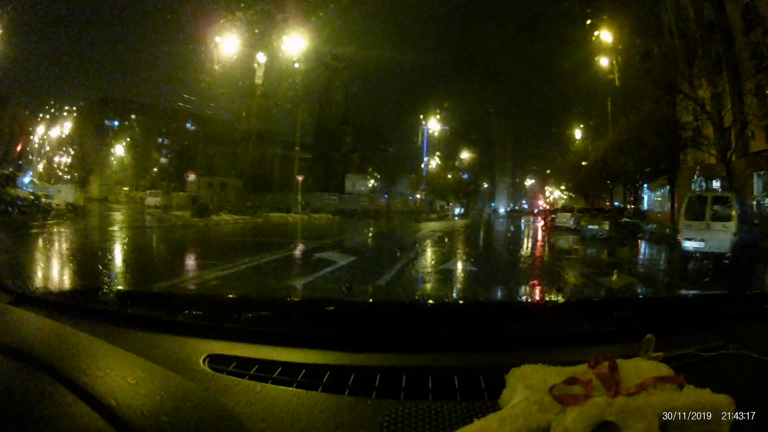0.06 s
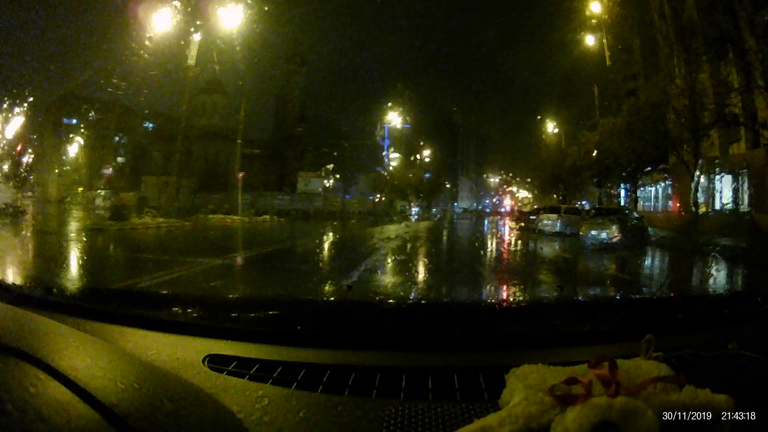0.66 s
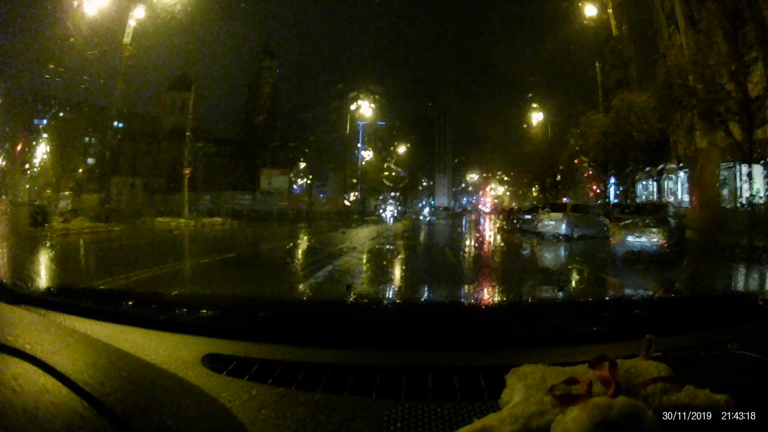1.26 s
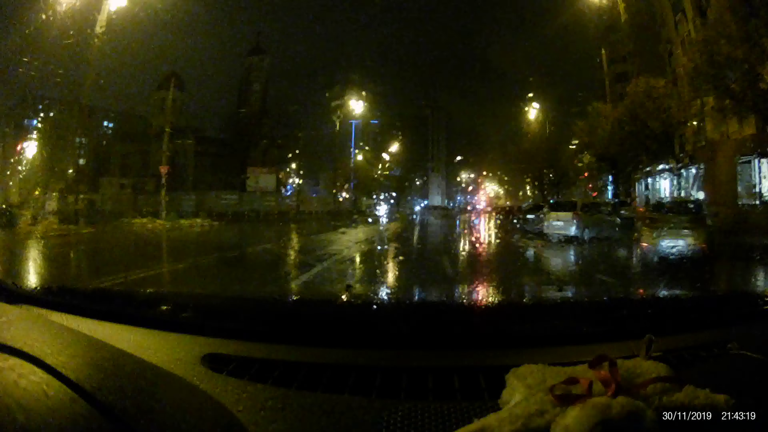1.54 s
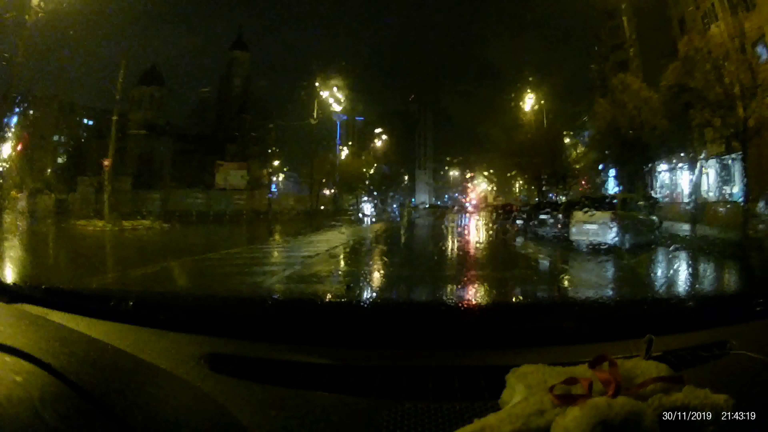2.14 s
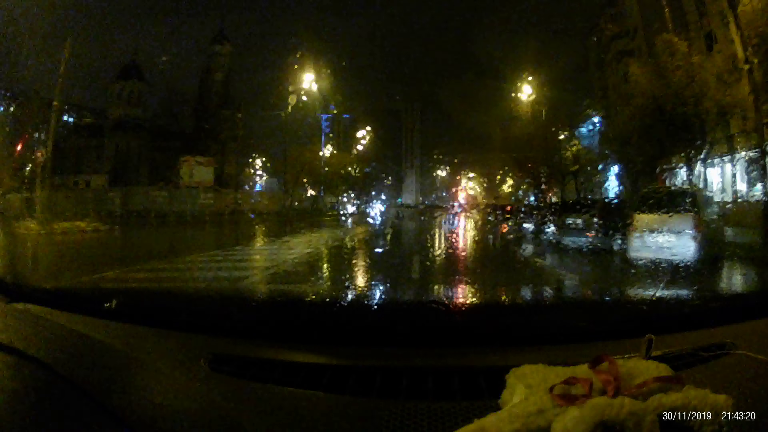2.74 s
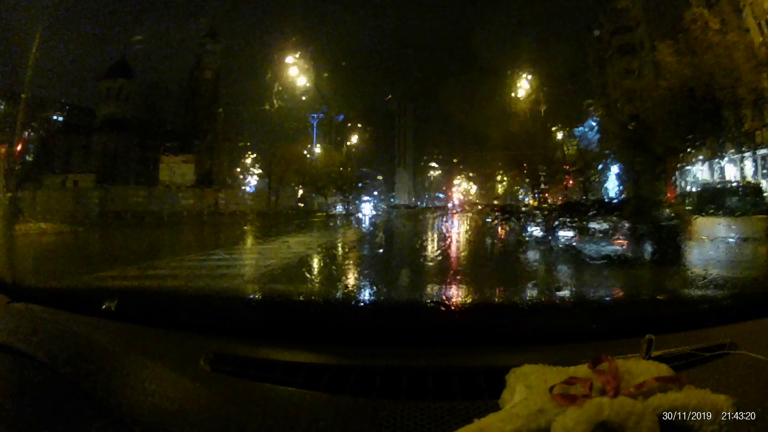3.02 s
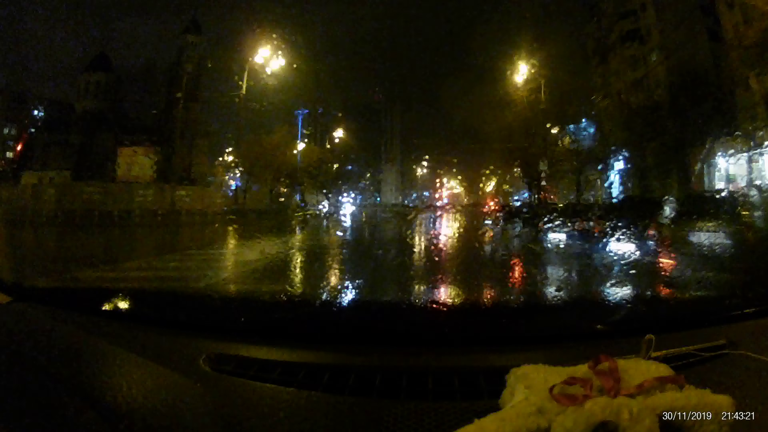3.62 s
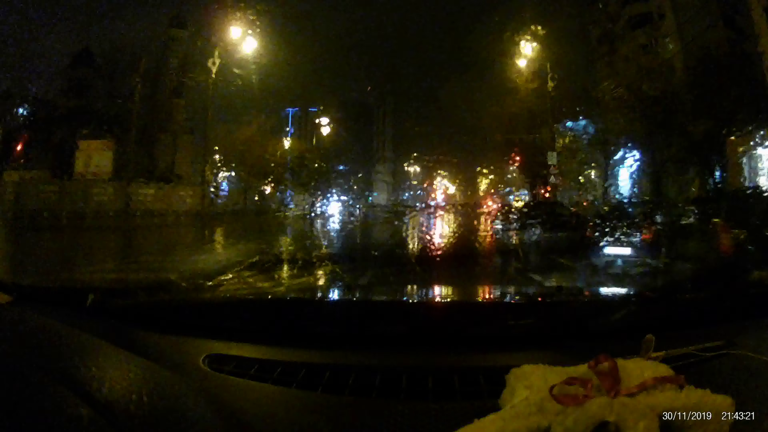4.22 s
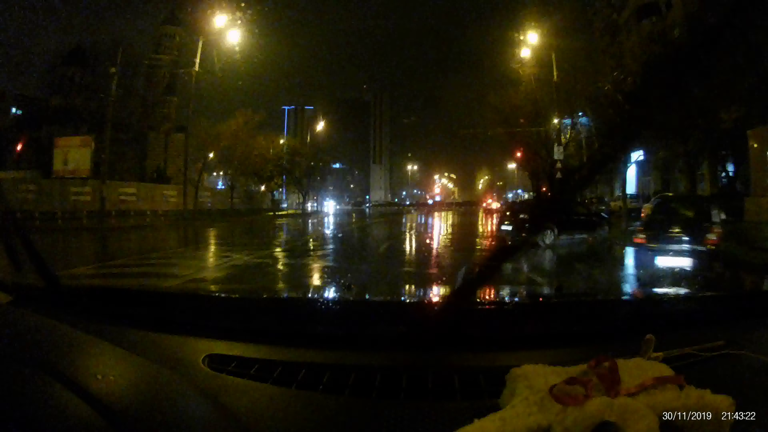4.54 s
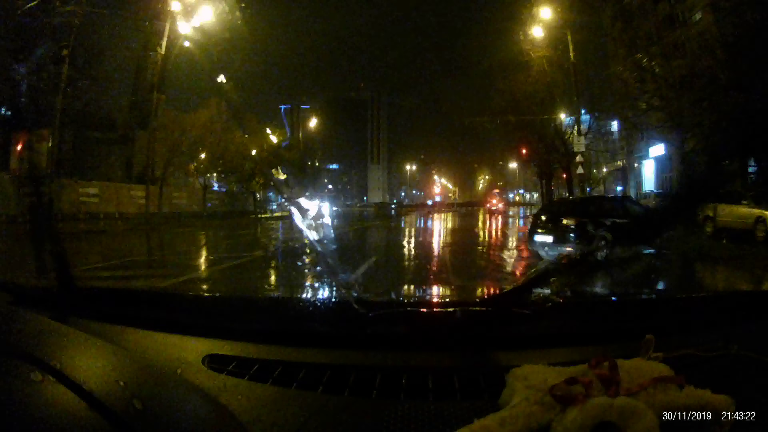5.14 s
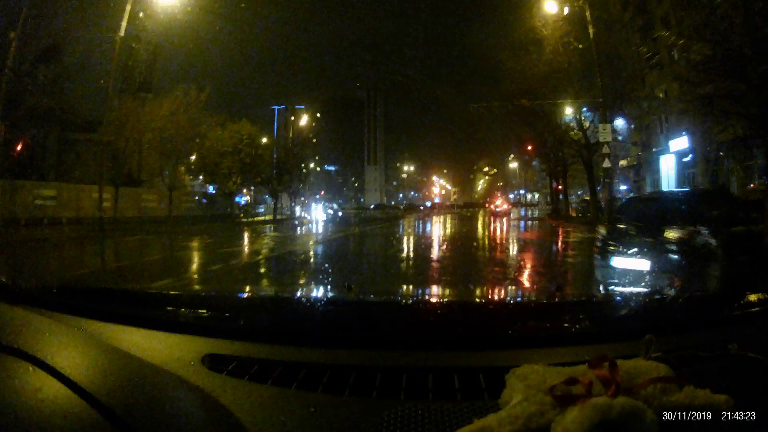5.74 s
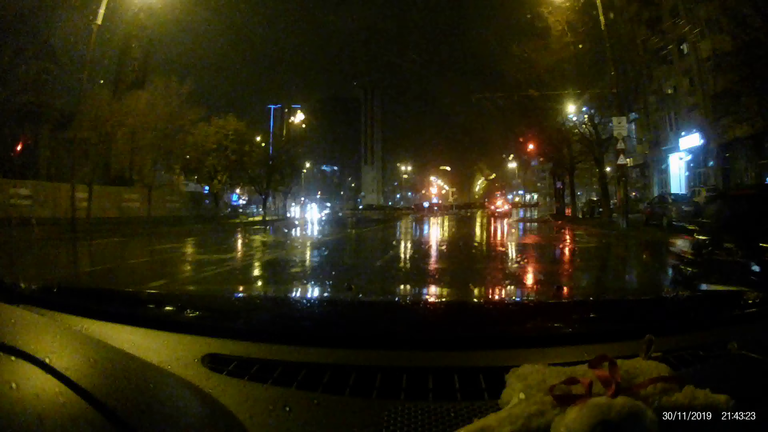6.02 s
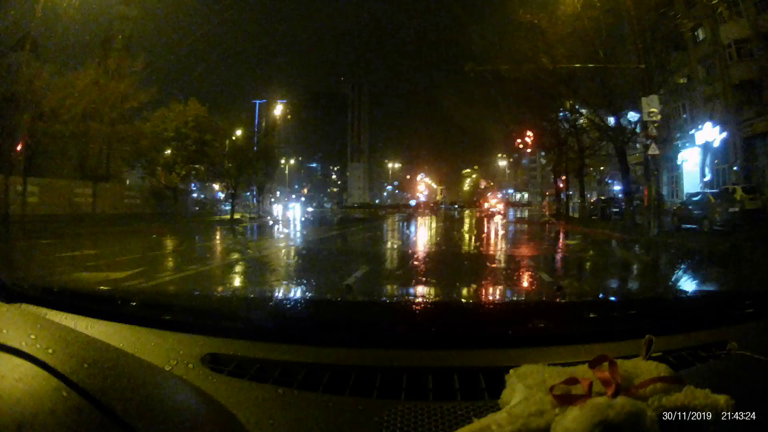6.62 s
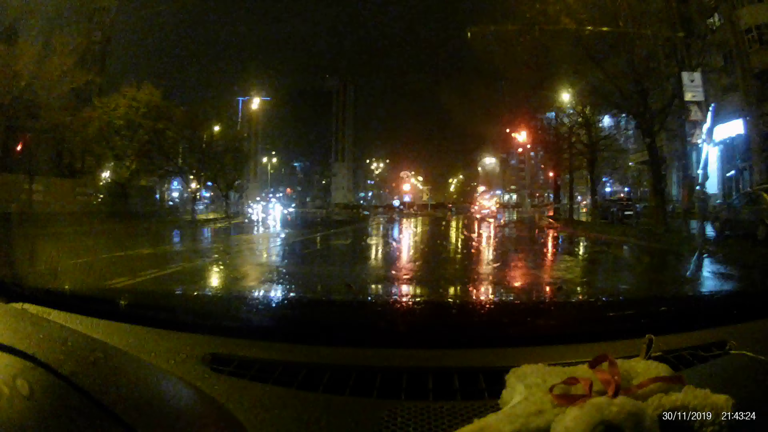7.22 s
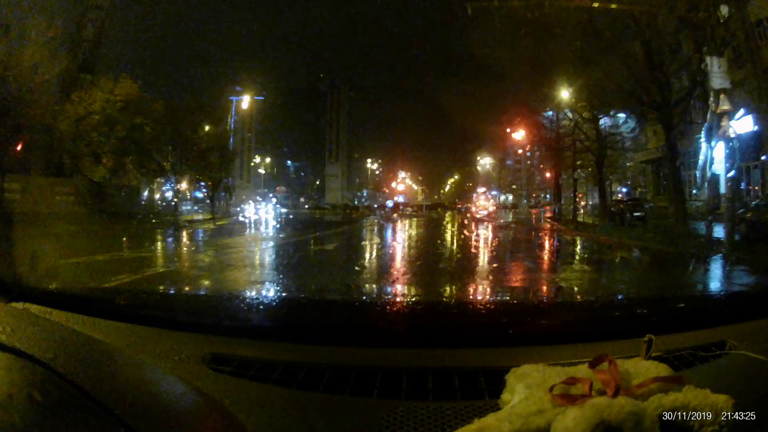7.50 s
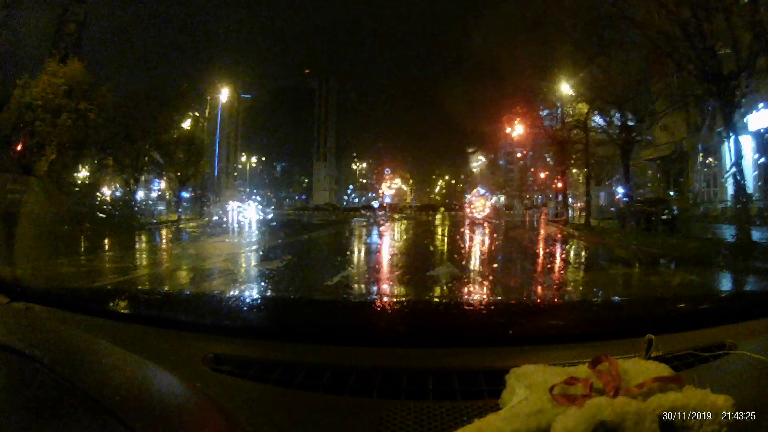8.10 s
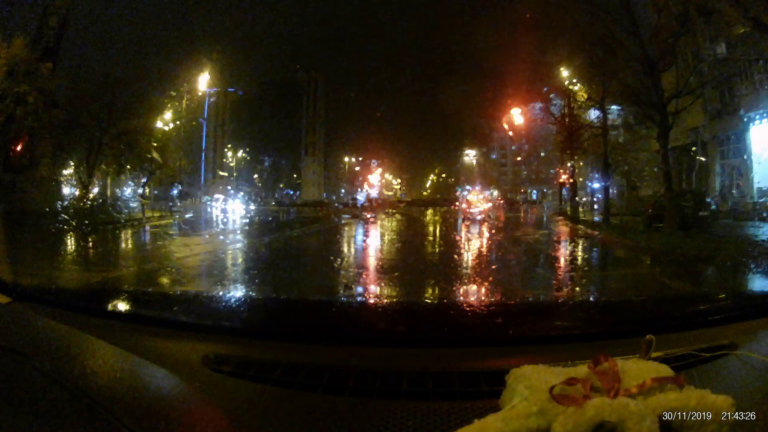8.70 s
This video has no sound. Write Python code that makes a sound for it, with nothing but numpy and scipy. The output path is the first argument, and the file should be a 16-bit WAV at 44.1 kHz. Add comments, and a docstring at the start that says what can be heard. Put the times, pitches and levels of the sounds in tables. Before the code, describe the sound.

Heard from the dashboard inside a car, tyres roll slowly over a wet street, making a continuous low rumble and cabin roar that ease slightly in the second half. Underneath are engine hum, a faint gear whine, soft spray and sparse ticks of rain on the windscreen. Plastic trim ticks at about 0.2 seconds. Dull road thuds come at 3.1 and 3.5 seconds. From 4.1 to 4.9 seconds the wipers make one sweep: the rubber sticks and slips with a juddering groan that falls in pitch and grows louder, flicking water, while the arm chatters and then knocks as it parks. At 6.5 seconds a plastic panel starts a faint, wavering squeak, ending at 7 seconds in one sharp snap, the loudest sound. Another low thud follows at 7.7 seconds, and the rumble continues until nearly 9 seconds. A barely audible electric whine pulses around 3 and 5 seconds.

```python
"""Tyres roll slowly over a wet street, heard inside the car: body rumble, cabin roar, spray, a few thuds.
The wipers make one sweep: the rubber sticks and slips down the glass with a juddering groan, flicks
water, and the arm knocks as it parks. Plastic trim ticks, rubs with a squeak and snaps once, loudly.
Underneath sit engine hum, a faint gear whine, light rain on the windscreen and a trace of electronics."""
import sys
import numpy as np
from scipy import signal
from scipy.fft import rfft, irfft, next_fast_len
from scipy.io import wavfile
from scipy.ndimage import uniform_filter1d, map_coordinates

SR = 44100
rng = np.random.default_rng(int(sys.argv[2]) if len(sys.argv) > 2 else 0)


def unload_wav(signal):
    """Save mono or channel-first audio to the path in sys.argv[1] as 16-bit WAV at rate SR, clipped to [-1, 1]."""
    wavfile.write(
        sys.argv[1],
        SR,
        np.round(np.clip(np.atleast_2d(signal).T, -1, 1) * 32767).astype(np.int16),
    )


N = 386316

# tyre noise, easing off as the car slows: t/s, level/dB
ROLLING_LEVEL = [(0, -44), (2.5, -45), (4.0, -45), (5.1, -45.5), (6.1, -47.5), (8.2, -48.5), (8.76, -45)]


def amp(db):
    """Decibels to gain."""
    return 10 ** (np.asarray(db) / 20)


def unit(x):
    """Scale to rms 1."""
    return x / np.sqrt(np.mean(x ** 2) + 1e-20)


def curves(rows):
    """One automation curve for each column after the time."""
    times, *columns = np.transpose(rows)
    return [np.interp(np.arange(N) / SR, times, column) for column in columns]


def during(start, end):
    """A gate with 10 ms fades."""
    t = np.arange(N) / SR
    return np.clip(np.minimum(t - start, end - t) * 100, 0, 1)


def wobble(rate):
    """A smooth random curve, rate knots a second."""
    knots = rng.standard_normal(int(N * rate / SR) + 4)
    return map_coordinates(knots, [np.arange(N) * rate / SR])


def filtered(x, response):
    """x times a complex response of frequency."""
    size = next_fast_len(len(x) + SR // 2)
    return irfft(rfft(x, size) * response(np.fft.rfftfreq(size, 1 / SR)), size)[:len(x)]


def eq(x, points):
    """x through an EQ curve (f/Hz, level/dB) that falls 60 dB an octave beyond its ends."""
    def response(hz):
        point_hz, db = np.transpose(points)
        octave, known = np.log2(hz + 1), np.log2(point_hz)
        outside = np.abs(octave - np.clip(octave, known[0], known[-1]))
        return amp(np.interp(octave, known, db) - 60 * outside)
    return filtered(x, response)


def noise(spectrum):
    """Coloured noise of rms 1."""
    return unit(eq(rng.standard_normal(N), spectrum))


def resonate(x, modes):
    """x through resonances (f/Hz, width/Hz, level/dB) of alternating polarity."""
    return filtered(x, lambda f: sum(
        (-1) ** k * amp(db) * 1j * f * width / (centre ** 2 - f ** 2 + 1j * f * width)
        for k, (centre, width, db) in enumerate(modes)))


def phase_of(hz):
    """Running phase of a pitch curve."""
    return 2 * np.pi * np.cumsum(hz) / SR


def strikes(rows, ring):
    """Trigger one sound at each row (t/s, peak/dB)."""
    blows = np.zeros(N)
    for s, db in rows:
        blows[int(np.clip(s * SR, 0, N - 1))] += amp(db)
    return signal.fftconvolve(blows, ring / np.abs(ring).max())[:N]


def hits(rows, modes):
    """Blows (t/s, peak/dB, cutoff/Hz) on one body; a softer contact takes the treble away."""
    out = np.zeros(N)
    for s, db, cutoff_hz in rows:
        contact = signal.butter(5, cutoff_hz, fs=SR, output="sos")
        push = signal.sosfilt(contact, signal.unit_impulse(SR // 2))
        ring = resonate(push, modes)
        out[round(s * SR):][:len(ring)] += amp(db) * ring / np.abs(ring).max()
    return out


def road_rumble(level_db=-33, follow=0.81):
    """The tyres shake the body, harder at higher rolling speed."""
    # low end of the road: f/Hz, level/dB
    spectrum = [(11, -34.5), (18, -4), (43, -2), (75, -9), (97, -7.5), (134, -10.5), (148, -10.5),
                (163, -25.5), (173, -22), (193, -15.5), (210, -11.5), (238, -41), (268, -34), (330, -44),
                (430, -57.5), (730, -120)]
    # the body rocking on its springs, its panels booming: f/Hz, width/Hz, level/dB
    body_modes = [(33, 7.8, -2), (97, 16.4, -11.5), (130.5, 10, -14)]
    rolling_db, = curves(ROLLING_LEVEL)
    shake = noise(spectrum)
    body = unit(resonate(noise([(20, 0), (160, 0)]), body_modes))
    level = amp(level_db + follow * (rolling_db - rolling_db.mean()) + 0.92 * wobble(5))
    return level * (shake + amp(-2) * body)


def tyre_roar():
    """The rolling tyres roar through the cabin."""
    # midrange of the road: f/Hz, level/dB
    spectrum = [(140, -33.5), (240, -8.5), (266, 3.5), (329, -4), (481, -5), (513, -7.5), (601, -5),
                (653, -10.5), (751, -10), (912, -14), (1010, -15), (1120, -6.5), (1400, -18), (1730, -29),
                (2200, -37), (2860, -63.5), (4840, -120)]
    rolling_db, = curves(ROLLING_LEVEL)
    return amp(rolling_db - 0.43 + 1.4 * wobble(6.9)) * noise(spectrum)


def tyre_spray(level_db=-70.4, follow=0.7):
    """Water thrown up by the tyres hisses along with the rolling speed."""
    # wet hiss: f/Hz, level/dB
    spectrum = [(1000, -26.5), (1700, -4), (2080, -1.5), (2540, -1), (3230, -12.5), (3820, -9),
                (5280, -17.5), (5490, -17.5), (5820, -19), (6050, -16.5), (7600, -29.5), (8000, -32.5),
                (10400, -55.5), (17600, -120)]
    rolling_db, = curves(ROLLING_LEVEL)
    level = amp(level_db + follow * (rolling_db - rolling_db.mean()) + 1.5 * wobble(25))
    return level * noise(spectrum)


def cavity_ring():
    """Road noise sets the air ringing in the tyres and the cabin."""
    # air resonances: f/Hz, width/Hz, level/dB
    air_modes = [(213.55, 7.7, 2), (275.6, 6, -13.5), (482.5, 19, -23), (1086, 32, -20.5)]
    rolling_db, = curves(ROLLING_LEVEL)
    return amp(rolling_db + 1.5) * unit(resonate(noise([(170, 0.011), (1200, 0.0014)]), air_modes))


def bumps():
    """Each bump sets the body booming for a few cycles; a sharp one reaches the higher modes."""
    # wheel thuds: t/s, peak/dB, cutoff/Hz
    thuds = [(0.31, -23, 60), (3.122, -17.5, 170), (3.466, -13, 59), (4.813, -21, 55), (4.895, -19.5, 55),
             (6.43, -26.5, 55), (7.73, -18.5, 50)]
    # body boom: f/Hz, width/Hz, level/dB
    boom_modes = [(44.7, 4.5, 1), (93.6, 5.2, 3), (133, 4.6, 0.5)]
    return hits(thuds, boom_modes)


def wiper_blade(first_slip_hz=503.2, sag_hz_per_s=500, lowest_slip_hz=225, fully_wet_s=4.5):
    """The rubber sticks and slips ever more slowly; each slip shakes the blade and the glass."""
    # chirp, light slide, then heavy drag: t/s, groan level/dB, scrape level/dB, roughness/0-1
    sweep = [(4.07, -34, -52, 0.64), (4.125, -47, -34.5, 0.37), (4.17, -19.5, -22.5, 0.19),
             (4.236, -24, -34, 0.28), (4.275, -29.5, -40.5, 0.96), (4.43, -23.5, -31, .75),
             (4.465, -17, -24.5, 0.35), (4.565, -17.5, -30.5, .45), (4.6, -13.5, -22.5, 0.46),
             (4.72, -15.5, -20, 0.43), (4.795, -20.5, -24.5, 0.75), (4.855, -27, -47, .9)]
    # tone of the windscreen: f/Hz, level/dB
    glass_eq = [(240, -43), (400, -5.5), (442, -0.5), (492, -4.5), (562, 7), (621, -10), (679, 1),
                (741, -4), (953, -11), (1090, 1.5), (1800, -33), (2340, -57), (3960, -120)]
    # the water film tearing: f/Hz, level/dB
    rasp_spectrum = [(1350, -5), (1600, 13.5), (1900, 1.5), (2450, 2), (3100, -15), (4200, -17),
                     (5400, -26), (6400, -31), (7800, -41)]
    t = np.arange(N) / SR
    start, end = sweep[0][0], sweep[-1][0]
    groan_db, scrape_db, rough = curves(sweep)
    slip_hz = np.maximum(first_slip_hz - sag_hz_per_s * np.maximum(t - start, 0), lowest_slip_hz)
    phase = phase_of(slip_hz * (1 + 0.08 * rough * wobble(260) + 0.02 * wobble(35)))
    slips = np.diff(np.floor(phase / (2 * np.pi)), prepend=0)  # one click a cycle
    slips *= amp(8.9 * rough * wobble(300)) / np.sqrt(slip_hz)
    # rough slips smear into bursts of friction; even ones sing at the octave
    friction = rng.standard_normal(N) * (1 + 0.2 * np.cos(phase))
    scrape = np.sqrt(1 - rough) * unit(eq(slips, glass_eq))
    scrape += np.sqrt(rough) * unit(eq(friction, glass_eq))
    scrape += amp(1) * (1 - rough) ** 3 * np.sin(2 * phase)
    groan = np.sqrt(2 - 2 * rough ** 2) * np.sin(phase)
    groan += rough * noise([(150, 0), (260, 4.5), (420, -7)])
    # the film tears in time with the slips, louder as water gathers ahead of the blade
    rasp = unit(noise(rasp_spectrum) * (1 + 0.54 * np.cos(phase)) * amp(3.7 * wobble(220)))
    rasp *= amp(np.interp(t, [start, fully_wet_s], [-38, -24.5]))
    judder = amp(1.6 * wobble(75))
    grip_db = 1.8 * wobble(40)  # the lip bites and lets go
    rubbing = amp(scrape_db + grip_db) * (amp(0.73) * scrape + rasp)
    return judder * (amp(groan_db - 3.5) * groan + rubbing) * during(start, end)


def wiper_arm(drag_start_s=4.63, drag_length_s=0.16, hop_cutoff_hz=2800, seat_cutoff_hz=1600):
    """The arm jerks along the glass, chatters in the heavy drag and knocks as it parks."""
    # jerks, then the parking knock: t/s, peak/dB, cutoff/Hz
    knocks = [(4.131, -21, 1810), (4.252, -22.5, 1540), (4.306, -18, 1390), (4.456, -14, 2200),
              (4.532, -14.5, 2600), (4.588, -14, 2600), (4.617, -20, 2397), (4.792, -13, 1905),
              (4.824, -16, 1880), (4.8955, -12, 1800)]
    # the arm touches, seats and rattles, relative to the parking knock: t/s, peak/dB
    rattle = [(-.0075, -11.5), (.0065, -9), (0.026, -15.5), (.044, -17)]
    # ring of the arm: f/Hz, width/Hz, level/dB
    arm_modes = [(445, 88, 1.5), (640, 85, 4.5), (1270, 72, -1), (1930, 1200, -25.5), (4000, 1400, -62.5)]
    park_s, park_db, _ = knocks[-1]
    seating = [(park_s + s, park_db + db, seat_cutoff_hz) for s, db in rattle]
    hops = [(drag_start_s + drag_length_s * when, -28 + 5.5 * size, hop_cutoff_hz)
            for when, size in rng.random(size=(9, 2))]
    return hits(knocks + seating + hops, arm_modes)


def water_drops(spit_start_s=4.57, spit_length_s=0.18, splat_decay_s=0.0094):
    """Water spits from under the blade and rain ticks on the windscreen."""
    # drops flicked off the blade: t/s, peak/dB
    flicks = [(4.4277, -37), (4.4364, -46), (4.4569, -32), (4.4608, -35.5), (4.579, -41), (4.5834, -39),
              (4.5874, -37), (4.617, -34), (4.6548, -37), (4.6734, -38), (4.6998, -37), (4.79, -45)]
    # the heaviest raindrops: t/s, peak/dB
    raindrops = [(1.1079, -50.5), (1.3144, -57), (1.5758, -55), (2.12, -57), (8.319, -55), (8.5674, -55),
                 (8.5984, -54)]
    # tone of a drop on glass: f/Hz, level/dB
    drop_eq = [(1500, -34.5), (2800, 1), (4300, 0.5), (5600, -17), (7200, -23), (8500, -30.5),
               (14000, -43.5)]
    t = np.arange(SR // 20) / SR
    lead_in = SR // 1000

    def splat():
        """A fresh burst of noise as a drop lands."""
        burst = rng.standard_normal(len(t)) * amp(-60 * t / splat_decay_s)
        return eq(np.pad(burst, (lead_in, 0)), drop_eq)

    tick = eq(signal.unit_impulse(len(t), lead_in), drop_eq)
    rain = sum(strikes([drop], splat()) for drop in raindrops)
    when, size = rng.random(size=(160, 2)).T
    drizzle = strikes(zip(when * N / SR, -69 + 12 * size ** 2), splat())
    when, size = rng.random(size=(30, 2)).T
    spit = strikes(zip(spit_start_s + spit_length_s * when, -51 + 11 * size ** 2), tick)
    return strikes(flicks, tick) + spit + rain + drizzle


def trim_snaps(echo_s=0.002774, echo_db=-7, echo_cutoff_hz=1600):
    """A plastic panel snaps; the windscreen throws the snap back."""
    # small ticks and one loud snap: t/s, peak/dB, cutoff/Hz
    snaps = [(0.1845, -23.5, 3220), (0.2375, -32.5, 2400), (6.9872, -2, 6200), (7.036, -33, 2400)]
    # ring of the panel: f/Hz, width/Hz, level/dB
    panel_modes = [(462, 42, -9), (558, 28.4, -4), (669, 47.5, 0.5), (824, 66, 2), (1100, 166, -11.5),
                   (1815, 190, -24.5), (2450, 110, -31), (3150, 410, -42.5), (4300, 320, -36),
                   (6400, 400, -64)]
    snap = hits(snaps, panel_modes)
    echo = filtered(snap, lambda hz: np.exp(-2j * np.pi * hz * echo_s) / (1 + (hz / echo_cutoff_hz) ** 4))
    tail = resonate(snap, [(668, 1.2, -7)])  # one panel mode rings on
    return snap + amp(echo_db) * echo + tail


def trim_squeak(resonance_hz=995, width_hz=79):
    """The panel rubs with a wavering squeak that swells whenever its pitch dips to the resonance."""
    # squeak pitch ahead of the loud snap: t/s, f/Hz
    glide = [(6.52, 1090), (6.575, 1250), (6.605, 1100), (6.636, 1088), (6.668, 1290), (6.705, 995),
             (6.755, 990), (6.795, 1275), (6.828, 1090), (6.895, 1000), (6.925, 1320)]
    pitch_hz, = curves(glide)
    pitch_hz = uniform_filter1d(pitch_hz, size=800)
    phase = phase_of(pitch_hz * (1 + 0.0112 * wobble(280)))
    level = amp(-49) + amp(-39) / (1 + (2 * (pitch_hz - resonance_hz) / width_hz) ** 2)
    tone = level * amp(1.5 * wobble(51)) * np.sin(phase)
    overtones = sum(amp(-72 - 4 * k + 5.1 * wobble(35)) * np.sin((k + 2) * phase) for k in range(4))
    overtones *= (level / level.max()) ** 0.26  # they swell less than the fundamental
    return (tone + overtones) * during(glide[0][0], glide[-1][0])


def engine_hum(start_hz=65.6, sag_hz_per_s=2.3):
    """The firing hum sinks in pitch as the engine runs steadily down."""
    # hum under changing load: t/s, level/dB
    load = [(0, -38.5), (1.6, -37), (4.2, -49.5), (5.4, -35.5), (6.6, -33), (8.76, -44.5)]
    hum_db, = curves(load)
    level = amp(hum_db + 4.7 * wobble(12))
    firing_hz = start_hz - sag_hz_per_s * np.arange(N) / SR
    return level * np.sin(phase_of(firing_hz * (1 + 0.011 * wobble(7.4))))


def gear_whine(sag_hz_per_s=6, edge_fade_db=11.5):
    """Meshing gears sing in swells, each drifting slightly flat."""
    # swells: centre t/s, length/s, mesh f/Hz, level/dB
    swells = [(1.398, 3.6, 601.3, -48.5), (5.356, .9, 559, -49.5), (6.654, 0.78, 605.4, -50)]
    t = np.arange(N) / SR
    waver_db = 0.79 * wobble(10)
    drift = 1 + 0.0036 * wobble(30)
    whine = np.zeros(N)
    for centre, length, hz, db in swells:
        level = amp(db + waver_db - edge_fade_db * (2 * (t - centre) / length) ** 2)
        whine += level * np.sin(phase_of((hz - sag_hz_per_s * (t - centre)) * drift))
    return whine


def electronics(whine_hz=5680, pulse_hz=10, whine_db=-77, hiss_db=-80):
    """A thin, unsteady, pulsing electric whine over microphone hiss."""
    # whine on and off: start t/s, end t/s
    spans = [(2.38, 3.48), (4.74, 5.8)]
    t = np.arange(N) / SR
    stagger = 0.5 * wobble(8)
    pulses = sum(during(start, end) * np.clip(0.4 + np.sin(2 * np.pi * pulse_hz * (t - start) + stagger),
                                              0, 1) for start, end in spans)
    level = amp(whine_db + 1.8 * wobble(30)) * pulses
    whine = level * np.sin(phase_of(whine_hz * (1 + 0.005 * wobble(150))))
    hiss = noise([(3000, 0), (8000, -1.5), (8700, 2.2), (9300, -0.5), (12000, -0.69), (16000, 1.4)])
    return whine + amp(hiss_db) * hiss


def scene():
    """The mono mix, as heard from the dashboard."""
    road = road_rumble() + tyre_roar() + tyre_spray() + cavity_ring() + bumps()
    drivetrain = engine_hum() + gear_whine()
    windscreen = wiper_blade() + wiper_arm() + water_drops()
    trim = trim_snaps() + trim_squeak()
    return (road + windscreen + trim + drivetrain + electronics())[None]


def record(dry, ceiling=0.97, top_hz=15750):
    """Short end fades, a soft clip on the loudest peak and a brick-wall low-pass."""
    faded = dry[0] * during(0, N / SR)
    rounded = faded / (1 + np.abs(faded / ceiling) ** 8) ** (1 / 8)
    return filtered(rounded, lambda hz: hz < top_hz)[None]


dry = scene()
out = record(dry)
unload_wav(out)
```